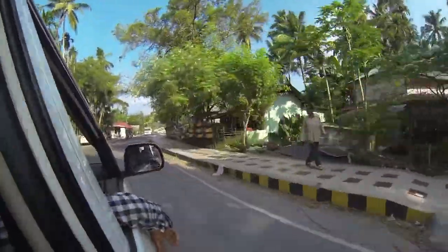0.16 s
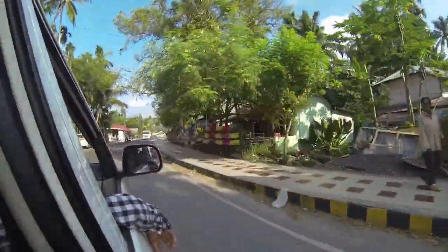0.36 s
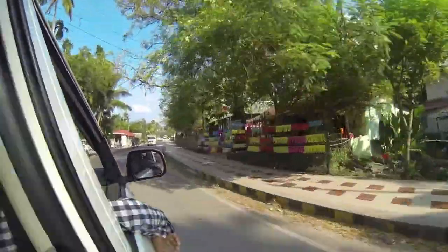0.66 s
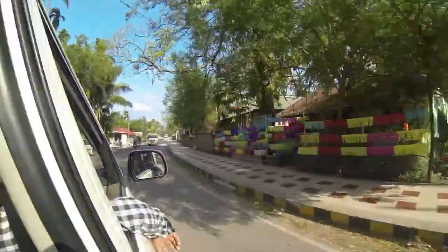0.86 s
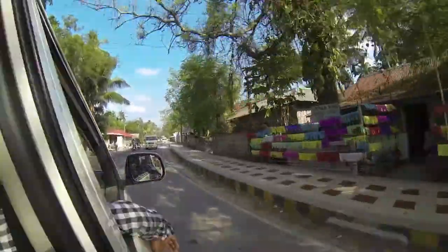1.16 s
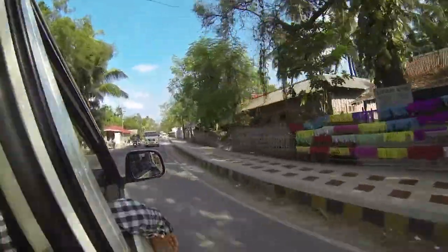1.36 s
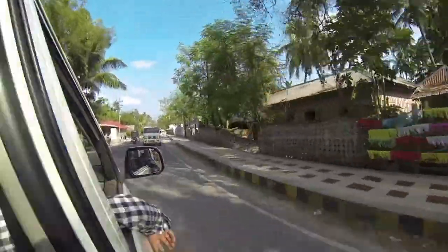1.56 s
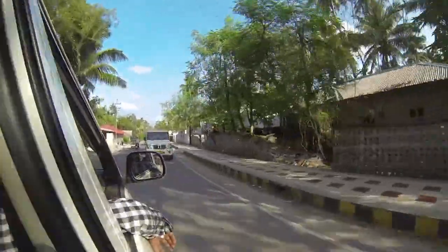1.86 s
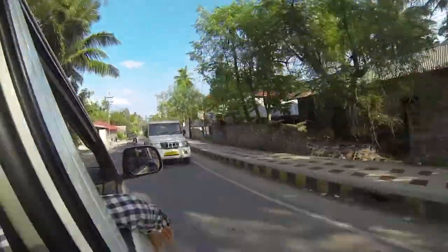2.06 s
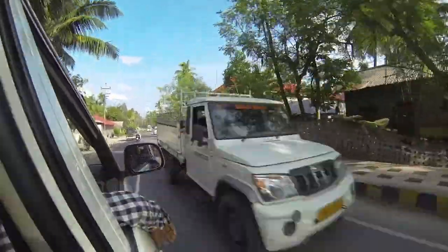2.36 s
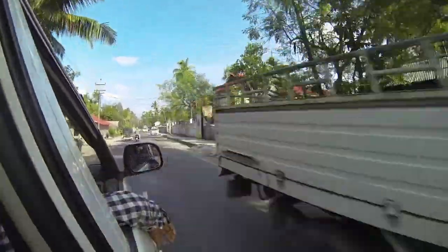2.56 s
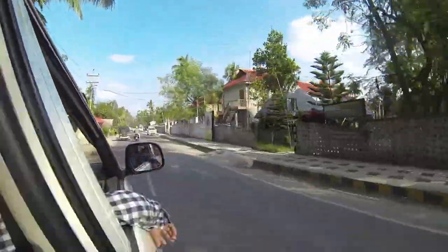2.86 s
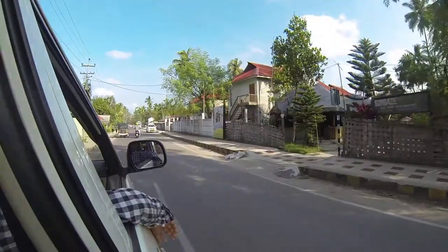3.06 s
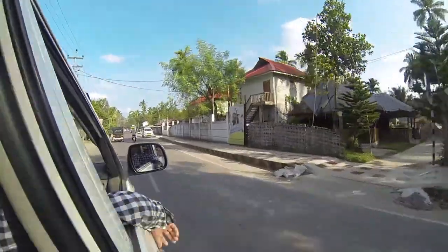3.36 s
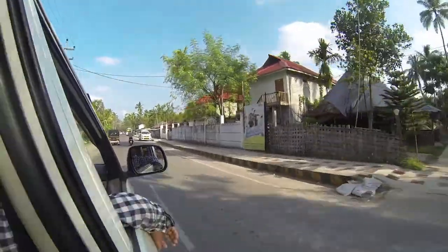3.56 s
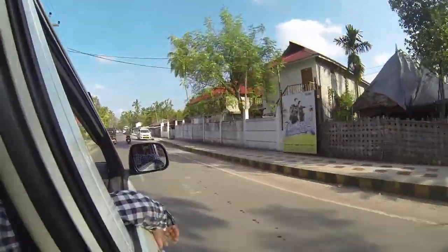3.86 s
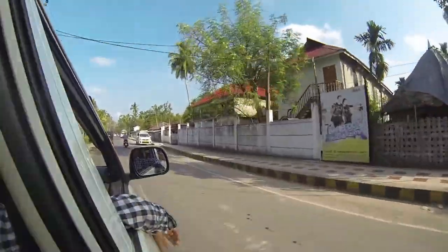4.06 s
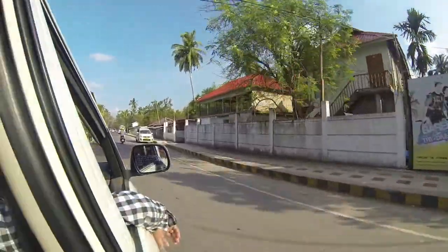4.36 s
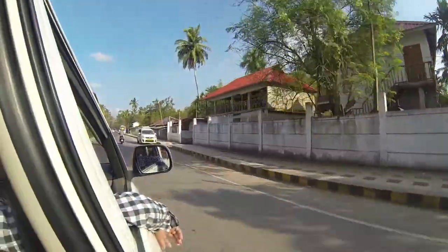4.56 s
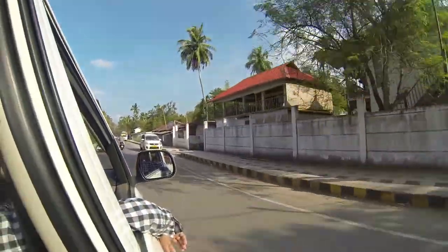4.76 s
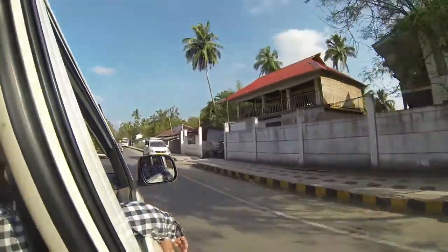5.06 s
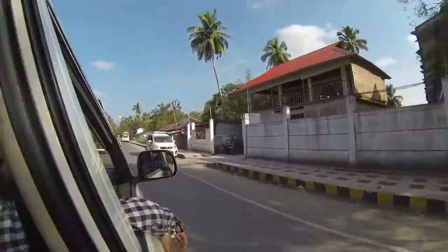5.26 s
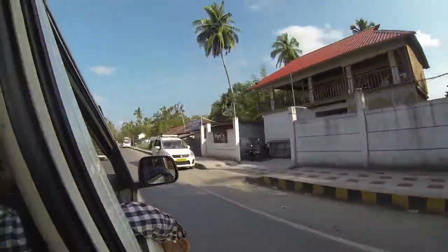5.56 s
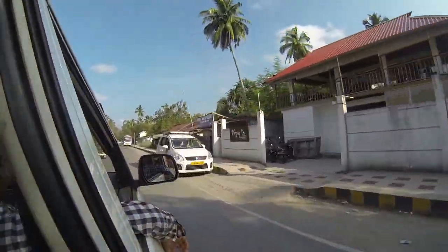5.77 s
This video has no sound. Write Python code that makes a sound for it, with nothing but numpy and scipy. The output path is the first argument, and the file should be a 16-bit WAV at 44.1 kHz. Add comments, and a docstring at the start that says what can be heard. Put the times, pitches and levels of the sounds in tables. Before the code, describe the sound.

Low, distorted wind buffets dominate, right on the microphone port, with muffled tyre noise behind. The first second and a half is dense and crackly, then thumping eases for a moment. An oncoming truck passes quickly as a short airy swell, near 2.3 seconds. Small high squeaks and barely audible chirps follow, while deep gusts keep striking, one very hard near the end.

```python
"""A small camera held out of the window of a moving car, 5.9 s. From the start, wind noise and pressure pulses
thump on its microphone port, jumps in the signal crackle, short noise bursts flap, and tyres roar as shaped noise.
From 1.25 s the road sound drops at once after some hard buffets and creeps back. Bright puffs of noise start at
2.0 s; near 2.3 s a truck passes the other way as a swell of band noise. From 2.2 s something on the car squeaks
and from 2.3 s a bird chirps by the roadside, both as short gliding tones."""
import sys
import numpy as np
from scipy import signal
from scipy.fft import rfft, irfft, next_fast_len
from scipy.io import wavfile
from scipy.ndimage import uniform_filter1d

SR = 44100
rng = np.random.default_rng(int(sys.argv[2]) if len(sys.argv) > 2 else 0)


def transcribe(signal):
    """Save signal, clipped to [-1, 1], as a 16-bit WAV file at the path in sys.argv[1]."""
    frames = np.atleast_2d(signal).T
    limited = np.clip(frames, -1, 1)
    pcm = np.round(limited * 32767).astype(np.int16)
    wavfile.write(sys.argv[1], SR, pcm)


N = 261072
CUTOFF_HZ = 15200


def amp(db):
    """dB to gain."""
    return 10 ** (np.asarray(db) / 20)


def rms_one(x):
    """Scaled to rms 1."""
    return x / np.sqrt(np.mean(x ** 2) + 1e-20)


def in_time(rows):
    """Each column of a (time, values...) curve, interpolated to every sample."""
    time_s, *columns = np.transpose(rows)
    return [np.interp(np.arange(N) / SR, time_s, column) for column in columns]


def drift(rate_hz):
    """Slow random curve of rms 1: noise through two equal poles at rate_hz."""
    step = 20  # samples between computed points
    pole = np.exp(-2 * np.pi * rate_hz * step / SR)
    settle = 4000
    noise = rng.standard_normal(N // step + settle + 2)
    slow = signal.lfilter([1], [1, -2 * pole, pole ** 2], noise)[settle:]
    return np.interp(np.arange(N) / step, np.arange(len(slow)), rms_one(slow))


def band(x, low_hz, high_hz):
    """Butterworth band-pass."""
    return signal.sosfilt(signal.butter(2, [low_hz, high_hz], "band", fs=SR, output="sos"), x)


def steep_band(x, low_hz, high_hz):
    """Band-pass applied twice for steeper edges."""
    return band(band(x, low_hz, high_hz), low_hz, high_hz)


def patchy_noise(spectrum, unit_band_hz, shared_db, own_db, rate_hz):
    """Coloured noise in octave bands that flicker partly together; rms 1 within unit_band_hz."""
    size = next_fast_len(N)
    hz = np.maximum(np.arange(size // 2 + 1) * SR / size, 1)
    point_hz, point_db = np.transpose(spectrum)
    colour = amp(np.interp(np.log(hz), np.log(point_hz), point_db, -200, -200))
    coloured = colour * rfft(rng.standard_normal(size))
    together = drift(rate_hz)
    octave = np.log2(hz / point_hz[0])
    out = np.zeros(N)
    for k in range(int(np.log2(point_hz[-1] / point_hz[0])) + 2):
        share = np.clip(1 - np.abs(octave - k), 0, 1)  # overlapping triangles add up to one
        flicker = amp(shared_db * together + own_db * drift(rate_hz))
        out += flicker * irfft(share * coloured, size)[:N]
    return out / np.std(band(out, *unit_band_hz))


# wind on the port, before the buffets thin it: (time [s], large eddies [dB], small eddies [dB])
WIND_LEVELS = [(0.0, -19, -22.5), (0.2, -24, -29), (0.28, -20.5, -26.5), (0.44, -24.5, -31),
               (0.65, -19, -28.5), (0.79, -24, -31.5), (1.04, -19.5, -26.5), (1.2, -22, -31),
               (1.45, -25.5, -36), (1.6, -21, -39), (1.63, -19.5, -31.5), (1.91, -27, -37),
               (1.96, -20, -27.5), (2.24, -20, -32), (2.42, -18.5, -26), (2.46, -26, -30),
               (2.88, -23, -40.5), (2.92, -21, -19), (2.97, -29.5, -48), (3.03, -21, -34.5),
               (3.15, -30, -34), (3.2, -23, -29.5), (3.43, -22, -40), (3.76, -18.5, -24.5),
               (3.91, -25.5, -42), (4.24, -13.5, -27.5), (4.34, -26, -42), (4.62, -16, -23),
               (4.65, -21, -37), (4.8, -18.5, -32), (4.83, -16, -29.5), (5.09, -26, -33),
               (5.64, -16, -30.5), (5.7, -31.5, -26.5), (5.75, -19.5, -36.5), (5.92, -33, -38)]
# eddy spectra, relative: (frequency [Hz], density [dB per Hz])
LARGE_EDDY_SPECTRUM = [(3, -32.5), (8, 6.5), (22, -3.5), (40, 2), (80, -11), (160, -28.5), (400, -42.5)]
SMALL_EDDY_SPECTRUM = [(40, -30), (90, 3), (125, -3), (180, -6), (300, -14.5), (500, -24.5), (750, -29.5),
                       (1100, -43.5), (3000, -57)]
STIR_DB = -5.5  # small-eddy change where the smoothed buffets are strongest


def wind(blows):
    """Eddies pass the port as lumpy pressure noise; buffets weaken both sizes, the small ones most."""
    large_db, small_db = in_time(WIND_LEVELS)
    large = patchy_noise(LARGE_EDDY_SPECTRUM, (8, 70), shared_db=1.13, own_db=0.0, rate_hz=9.5)
    small = patchy_noise(SMALL_EDDY_SPECTRUM, (90, 350), shared_db=2.5, own_db=2.5, rate_hz=37.0)
    stir = uniform_filter1d(np.abs(blows), size=2000)
    eddies = amp(large_db) * large + amp(small_db + STIR_DB * stir / stir.max()) * small
    calm = 1 / (1 + uniform_filter1d(np.abs(blows), size=300) / 0.13)
    return calm * eddies


# tyres and traffic, before the drops: (time [s], roar [dB], hiss [dB])
ROAD_LEVELS = [(0, -44.5, -61.5), (.6, -45, -64.5), (1.2, -45, -62.5), (1.35, -45.5, -63.5),
               (1.41, -41, -60.5), (1.55, -43.5, -63.5), (1.8, -41.5, -61), (2.2, -39.5, -56.5),
               (2.38, -35, -52), (2.48, -37, -52), (2.6, -36.5, -52.5), (2.7, -39, -54),
               (2.92, -39.5, -53.5), (3.2, -39.5, -54), (3.6, -37.5, -54.5), (3.8, -40, -56.5),
               (4.1, -36, -54.5), (4.48, -37, -54.5), (4.56, -36, -54), (4.66, -37.5, -55.5),
               (4.85, -38, -55.5), (5.1, -40, -57.5), (5.3, -37.5, -55.5), (5.38, -37.5, -55.5),
               (5.46, -39, -55.5), (5.6, -40, -56), (5.92, -38.5, -56)]
# road spectra, relative: (frequency [Hz], density [dB per Hz])
ROAR_SPECTRUM = [(150, -11.5), (300, -3), (480, -6.5), (800, -1.5), (1150, -8), (1390, -10.5), (1750, -7),
                 (1950, -9.5), (2400, -20), (3200, -53)]
HISS_SPECTRUM = [(1800, -24), (2600, 5.5), (3500, 0.5), (4300, -9.5), (5350, -13), (5650, -17), (7000, -24),
                 (8500, -22.5), (10000, -29.5), (12000, -31.5), (15000, -50.5)]


def road():
    """Tyre roar coloured by the camera housing, and the hiss above it, as flickering shaped noise."""
    roar_db, hiss_db = in_time(ROAD_LEVELS)
    roar = patchy_noise(ROAR_SPECTRUM, (600, 2400), shared_db=0.58, own_db=0.2, rate_hz=25)
    hiss = patchy_noise(HISS_SPECTRUM, (2600, 6000), shared_db=0.5, own_db=0.8, rate_hz=27)
    return road_drops() * (amp(roar_db) * roar + amp(hiss_db) * hiss)


# buffets: (time [s], peak [dB], mean flank length [ms])
BUFFET_EVENTS = [(0.006, -7.5, 4.9), (0.041, -14, 8.9), (0.096, -12.5, 6.4), (0.139, -9.5, 4.7),
                 (0.178, -8.5, 6), (0.241, -8, 5.8), (0.276, -3, 3.6), (0.331, -12.5, 9.6),
                 (0.384, -10, 9.6), (0.396, -13.5, 5.8), (0.507, -8, 5.2), (0.551, -11, 12),
                 (0.633, -10, 5.6), (0.651, -14, 5.3), (0.673, -5, 7.8), (0.727, -6.5, 4.8),
                 (0.818, -11.5, 3.5), (0.848, -12, 5.8), (0.885, -7, 4.7), (0.98, -11.5, 8.6),
                 (1.033, -6, 2.6), (1.039, -8, 4.4), (1.093, -11, 3.9), (1.099, -10.5, 3.9),
                 (1.243, -6.5, 4.2), (1.3, -11.5, 4.8), (1.416, -13, 3.6), (1.957, -7.5, 5.3),
                 (1.987, -8, 4.5), (2.054, -12, 4.1), (2.143, -10.5, 3.6), (2.267, -12, 3.6),
                 (2.327, -10, 6.1), (2.386, -6.5, 4), (2.428, -2, 8.3), (2.922, -2.5, 9.5),
                 (3.224, -10, 12.4), (3.392, -13, 15), (3.636, -12, 9.2), (3.688, -10, 4.4), (3.726, -9, 4),
                 (3.752, -6.5, 8.2), (3.788, -7, 13), (4.049, -12.5, 6.6), (4.168, -7, 10.7),
                 (4.204, -6, 4.6), (4.234, -8.5, 6.7), (4.275, -6.5, 7.7), (4.35, -10.5, 8.7),
                 (4.425, -14, 12), (4.542, -19, 7.1), (4.6, -4, 11.7), (4.785, -7, 22), (4.834, -7.5, 6),
                 (4.891, -2, 7.3), (5.062, -10.5, 12.5), (5.131, -15, 5.9), (5.262, -11.5, 3.8),
                 (5.331, -15.5, 10), (5.364, -10, 5.9), (5.403, -7, 4.2), (5.476, -14, 8.5),
                 (5.505, -13, 6.6), (5.561, -8, 6.4), (5.629, 1.5, 9.7), (5.824, -10.5, 7.1)]
PULL_SHARE = .65  # chance that a buffet sucks at the port
LEAN = .55  # one flank shorter, the other longer, by up to this share
POINTED = 0.84  # share of triangle in the shape; the rest is a rounded bump
REBOUND, REBOUND_WIDTHS = 0.13, 3  # opposite swing: share of the peak, length in flank lengths


def buffets():
    """Each buffet is one pointed, leaning push or pull of pressure inside a broader swing the other way."""
    pad = SR // 10
    out = np.zeros(N + 2 * pad)
    for time_s, peak_db, flank_ms in BUFFET_EVENTS:
        sign = -1 if rng.random() < PULL_SHARE else 1
        lean = LEAN * rng.uniform(-1, 1)
        for share, widths in ((1 + REBOUND, 1), (-REBOUND, REBOUND_WIDTHS)):
            flank = widths * flank_ms * SR / 1000
            rise, fall = int(flank * (1 + lean)), int(flank * (1 - lean))
            ramp = np.r_[np.linspace(0, 1, rise), np.linspace(1, 0, fall)]
            shape = POINTED * ramp + (1 - POINTED) * np.sin(np.pi / 2 * ramp) ** 2
            at = pad + round(time_s * SR) - rise
            out[at:at + rise + fall] += sign * share * amp(peak_db) * shape
    return out[pad:pad + N]


# crackle runs: (time [s], level at the run's end before scatter and filters [dB], length [ms])
CRACKLE_RUNS = [(0.006, -37.5, 3), (0.0938, -43, 6.2), (0.131, -39, 0.56), (0.14, -42, 2.5),
                (0.177, -44.5, 2.2), (0.2386, -45.5, 3.2), (0.265, -48, 5), (0.2725, -47, .6),
                (0.2756, -45, 1), (0.281, -44, 2.1), (0.296, -53, .6), (0.328, -56, .6),
                (0.384, -46.5, 4.6), (0.393, -50, .8), (0.398, -52, 2.9), (0.6337, -39, 0.49),
                (0.652, -45, 2.6), (0.674, -40, 2.8), (0.7136, -45, 0.6), (0.7284, -43, 3.4),
                (0.7495, -48, .6), (0.7645, -51, .6), (0.8498, -39, 0.67), (0.858, -54, .6),
                (0.883, -46, 1.9), (0.98, -49, 1.5), (1.034, -46, 0.69), (1.037, -44.5, 2.2),
                (1.058, -52, .6), (1.079, -48, .6), (1.091, -43, 0.6), (1.1002, -40.5, 2.8),
                (1.24, -43, 1.05), (1.2424, -40, 3.1), (1.3, -46, 3), (1.321, -51, .6), (1.407, -50, .6),
                (1.416, -52, 4), (2.418, -47, 6.5), (2.906, -49, 8.9), (2.9249, -40.5, 1.9),
                (4.1305, -49, 4.2), (4.8917, -45.5, 3.7)]
# faint single crackles at random early on; level before scatter and filters
FAINT_PER_S, FAINT_DB, FAINT_UNTIL_S = 40, -55, 1.46


def crackles(steps_per_s=4000, edge_hz=900, dull_hz=8000):
    """Runs of tiny jumps in the signal, a fraction of a millisecond apart, tending to grow along the run."""
    gate = np.zeros(N)
    for time_s, level_db, length_ms in CRACKLE_RUNS:
        at, n = round(time_s * SR), max(int(length_ms * SR / 1000), 4)
        gate[at:at + n] = amp(level_db) * np.linspace(.35, 1, n)
    phase = np.cumsum(steps_per_s / SR * amp(2.9 * drift(600)))
    ticks = np.diff(np.floor(phase), prepend=0)
    openings = np.diff(np.sign(gate), prepend=0)  # a run opens with a jump
    runs = gate * np.maximum(ticks, openings) * amp(3.0 * rng.standard_normal(N))
    chosen = (rng.random(N) < FAINT_PER_S / SR) * (np.arange(N) < FAINT_UNTIL_S * SR)
    faint = chosen * amp(FAINT_DB + 3 * rng.standard_normal(N))
    jumps = (runs + faint) * rng.choice([-1, 1], N)
    leak = np.exp(-2 * np.pi * edge_hz / SR)  # each jump decays back
    edges = signal.lfilter([1], [1, -leak], jumps + 1e-18)
    return band(edges, edge_hz, dull_hz)


def bursts(rows, low_hz, kick):
    """Band noise that starts at once, led by a kick, and dies away: (time s, peak dB, t60 s, top Hz)."""
    out, t = np.zeros(N + SR), np.arange(SR // 8) / SR
    for time_s, peak_db, t60_s, high_hz in rows:
        noise = rng.standard_normal(len(t))
        burst = amp(-60 * t / t60_s) * (noise + kick * (t < .0005))
        shaped = steep_band(burst, low_hz, high_hz)
        out[round(time_s * SR):][:len(t)] += amp(peak_db) * shaped / np.abs(shaped).max()
    return out[:N]


# sharp flaps of air across the port: (time [s], peak [dB], top [Hz])
FLAP_EVENTS = [(0.076, -28, 910), (0.172, -31, 800), (0.222, -29, 600), (0.2725, -25, 990),
               (0.361, -29, 500), (0.376, -30, 890), (0.429, -44, 500), (0.49, -34, 695),
               (0.59, -28.5, 1000), (0.661, -25, 1004), (0.813, -29, 694), (0.876, -24, 600),
               (0.999, -26, 444), (1.022, -23.5, 1100), (1.031, -24, 700), (1.073, -29.5, 2000),
               (1.094, -28.5, 800), (1.19, -33, 694), (1.546, -39, 600), (1.64, -31.5, 800),
               (2.024, -31, 600), (2.049, -27, 505), (2.197, -28, 700), (2.519, -36, 900),
               (3.222, -35, 2200), (4.053, -19, 1190), (4.175, -33, 1220), (4.549, -30.5, 1200),
               (4.922, -30, 494), (5.289, -33, 496), (5.623, -31, 590)]
FLAP_T60_S = .04


def flaps():
    """Air flaps across the port as low, fast-dying noise bursts with a kick at the front."""
    rows = [(time_s, peak_db, FLAP_T60_S, top_hz) for time_s, peak_db, top_hz in FLAP_EVENTS]
    return bursts(rows, 160, kick=0.66)


def sag(events, back_s):
    """dB that fall at once at each (time s, depth dB) and return exponentially, time constant back_s."""
    t = np.arange(N) / SR
    total_db = np.zeros(N)
    for time_s, depth_db in events:
        total_db -= depth_db * (t > time_s) * np.exp(-np.maximum(t - time_s, 0) / back_s)
    return total_db


# road-sound drops after hard buffets: (time [s], depth [dB])
ROAD_DROPS = [(1.252, 4.5), (2.43, 1.5), (2.929, 5), (4.893, 5), (5.632, 3.5)]
CREEP_S = 0.61  # time constant
DIP_DB, DIP_S = 3, 0.054  # brief dip at the end of each crackle run over 1 ms; time constant


def road_drops():
    """Gain on the road sound: long drops at listed times, brief dips after the longer crackles."""
    dips = [(time_s + length_ms / 1000, DIP_DB) for time_s, _, length_ms in CRACKLE_RUNS if length_ms > 1]
    return amp(sag(ROAD_DROPS, CREEP_S) + sag(dips, DIP_S))


# bright puffs of air from passing traffic: (time [s], peak [dB], t60 [s])
PUFF_EVENTS = [(2.029, -60, .012), (2.478, -54, 0.04), (2.491, -61, .02)]


def puffs():
    """Puffs of air as short high-band noise bursts without a kick."""
    return bursts([(*puff, 11500) for puff in PUFF_EVENTS], 8500, kick=0)


# the truck's airy rush: (nearest [s], time from nearest to half amplitude [s], mean level at nearest [dB])
TRUCK_RUSH = (2.3, 0.071, -69)
# the thin hiss that trails it, same columns
TRUCK_TRAIL = (2.5, .2, -86)


def truck_band(passing, low_hz, high_hz):
    """Noise band that swells and fades as the truck passes, amplitude 1 / (1 + time squared)."""
    nearest_s, halve_s, level_db = passing
    nearness = 1 / (1 + ((np.arange(N) / SR - nearest_s) / halve_s) ** 2)
    noise = rms_one(steep_band(rng.standard_normal(N), low_hz, high_hz))
    return amp(level_db + 2.0 * drift(30)) * nearness * noise


def truck():
    """Bright tyre rush of a passing truck, then a thinner, higher hiss."""
    return truck_band(TRUCK_RUSH, 4700, 5800) + truck_band(TRUCK_TRAIL, 8500, 13500)


GLIDE_BEND = .6  # under 1: most of a note's glide comes early


def notes(table, waver, throb_db, blur):
    """Short gliding tones, loudest near the start; blur is the share of randomly modulated amplitude."""
    out = np.zeros(N)
    wobble = waver * drift(300)
    throb = amp(throb_db * drift(150))
    smear = 1 - blur + blur * drift(160)
    for time_s, length_s, rise_s, start_hz, end_hz, level_db, overtones_db in table:
        at, n = round(time_s * SR), round(length_s * SR)
        part = slice(at, at + n)
        along = np.linspace(0, 1, n)
        glide_hz = start_hz + (end_hz - start_hz) * along ** GLIDE_BEND
        unsteady = 1 + wobble[part] * (.5 + .5 * (1 - along) ** 2)
        phase = 2 * np.pi * np.cumsum(glide_hz * unsteady) / SR
        shape = np.minimum(along * length_s / rise_s, 1) ** 2 * (1 - along) ** .75
        overtones = sum(np.sin(k * phase) for k in range(2, 5) if k * end_hz < CUTOFF_HZ)
        tone = np.sin(phase) + amp(overtones_db) * overtones
        out[part] += amp(level_db) * shape * throb[part] * smear[part] * tone
    return out


# squeaks: (time [s], length [s], rise [s], start [Hz], end [Hz], level before shaping [dB],
# each overtone relative to the fundamental [dB])
SQUEAK_NOTES = [(2.212, 0.029, 0.0063, 3850, 3780, -44, -42), (2.558, 0.033, .014, 3620, 3700, -34, -32),
                (2.787, 0.076, 0.0045, 3330, 3580, -39.5, -27), (3.122, 0.09, .005, 3260, 3470, -47, -27),
                (3.217, .012, 0.0032, 3000, 2920, -40.5, -39), (3.395, .022, .004, 3450, 3420, -52, -40),
                (3.435, 0.055, .004, 3400, 3380, -49, -40), (3.705, 0.067, 0.0062, 3360, 3440, -50, -36),
                (4.128, 0.018, 0.0035, 3700, 3700, -53, -43), (4.141, 0.056, 0.0043, 3430, 3440, -48, -57)]


def squeaks():
    """Something on the car squeaks: gliding tones with wavering pitch and rough amplitude."""
    return notes(SQUEAK_NOTES, waver=0.024, throb_db=2.5, blur=.3)


# thin high chirps: (time [s], length [s], rise [s], start [Hz], end [Hz], level before shaping [dB],
# each overtone relative to the fundamental [dB])
CHIRP_NOTES = [(2.325, 0.048, .003, 6400, 6600, -66, -39), (2.744, 0.035, 0.0042, 8700, 8150, -56, -25),
               (2.77, .05, .003, 8450, 8750, -65, -30), (3.085, 0.042, .003, 8100, 8500, -77, -28),
               (3.657, 0.09, .005, 8130, 8760, -70, -21), (3.795, 0.054, .003, 8350, 8600, -73, -33),
               (4.015, 0.042, 0.0027, 8300, 8400, -79, -30), (4.222, 0.089, .005, 8000, 7900, -65, -28),
               (4.27, 0.053, 0.0027, 8400, 8500, -76, -30)]


def chirps():
    """A roadside bird: higher gliding tones, steadier in pitch and less rough."""
    return notes(CHIRP_NOTES, waver=0.015, throb_db=3.5, blur=.1)


def scene():
    """Everything reaches one microphone; the tallest wind and buffet peaks on the port are rounded."""
    blows = buffets()
    push = wind(blows) + blows
    rounded = push / (1 + np.abs(push / .45) ** 4) ** .25  # limit 0.45
    port = rounded + crackles() + flaps()
    return (port + road() + puffs() + truck() + squeaks() + chirps())[None]


def record(dry):
    """The lowest rumble and the top are cut; the first 3 ms fade in."""
    fade = np.minimum(np.arange(N) / (.003 * SR), 1)
    x = signal.sosfilt(signal.butter(1, 6, "high", fs=SR, output="sos"), dry * fade)
    return signal.sosfilt(signal.cheby2(12, 70, CUTOFF_HZ, fs=SR, output="sos"), x)


dry = scene()
out = record(dry)
transcribe(out)
```